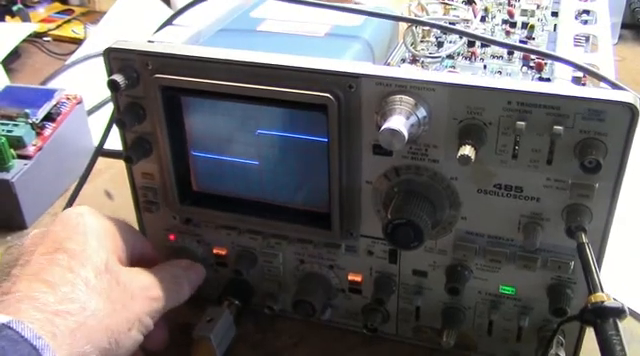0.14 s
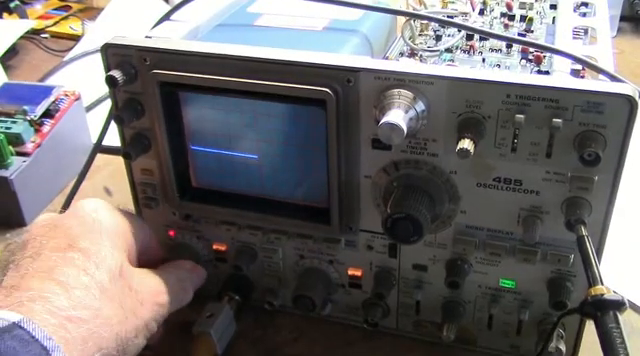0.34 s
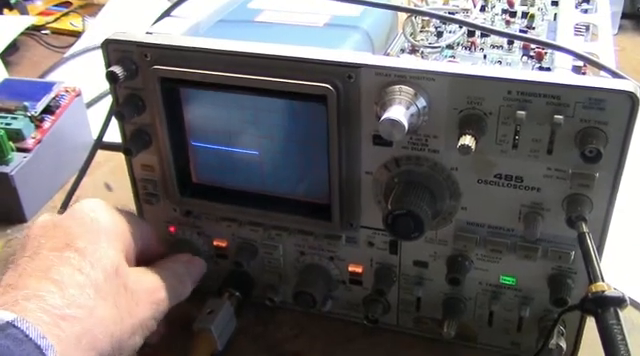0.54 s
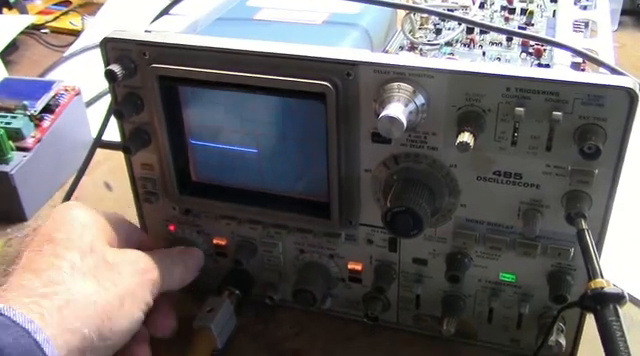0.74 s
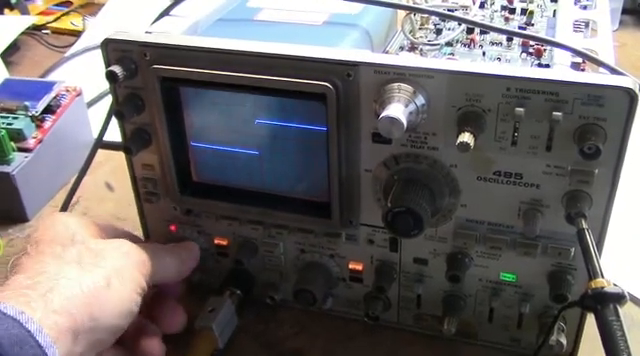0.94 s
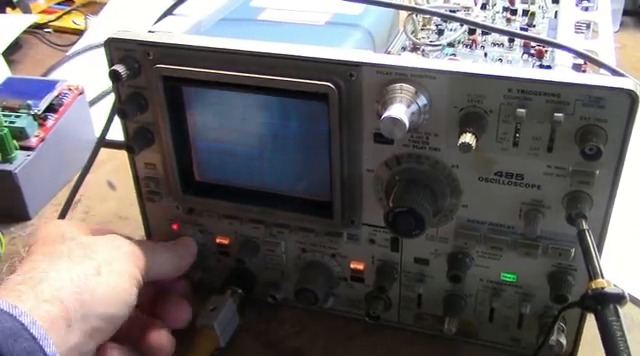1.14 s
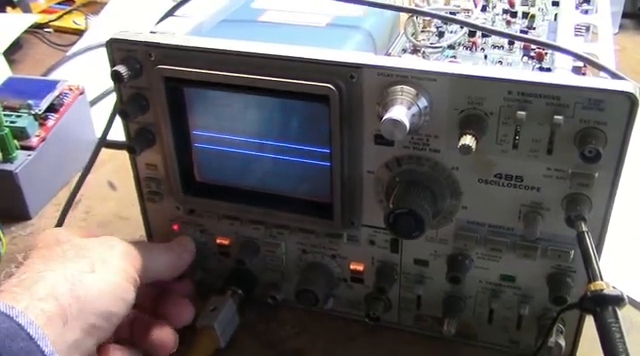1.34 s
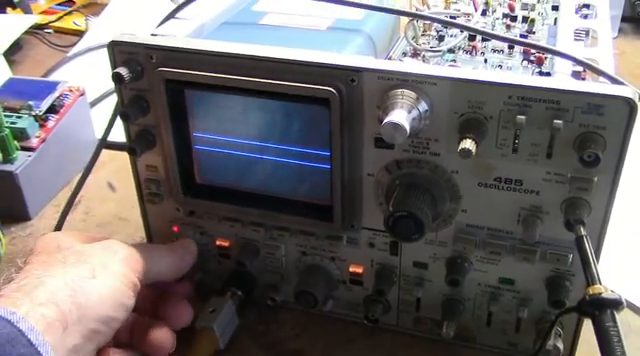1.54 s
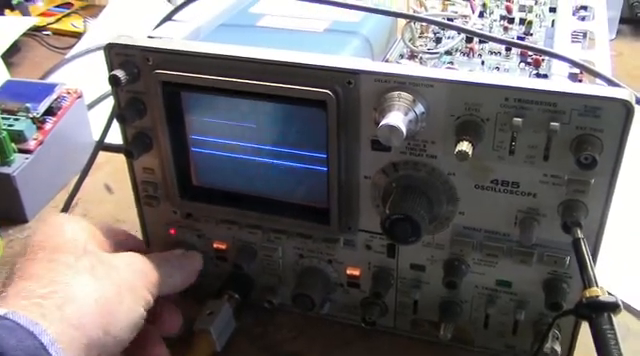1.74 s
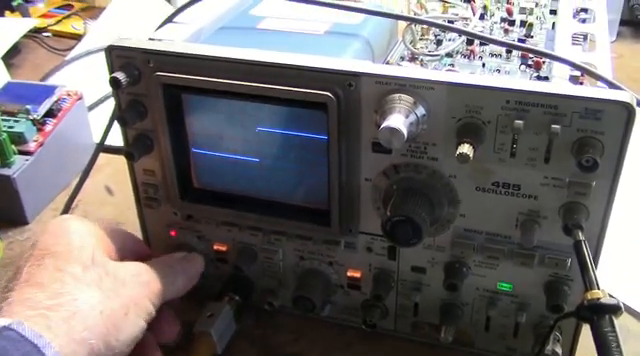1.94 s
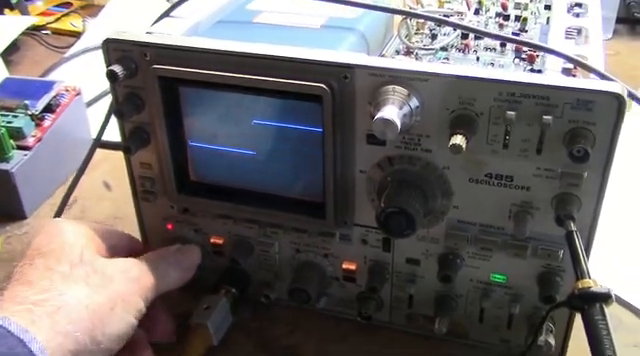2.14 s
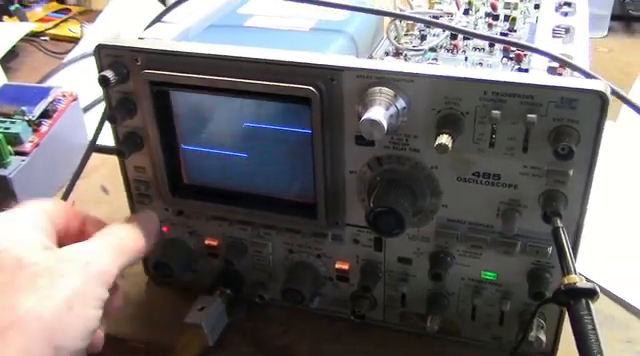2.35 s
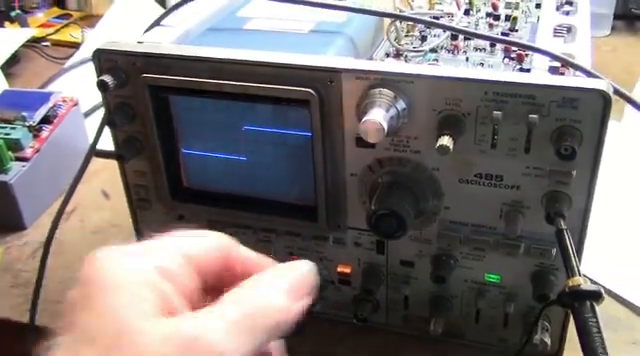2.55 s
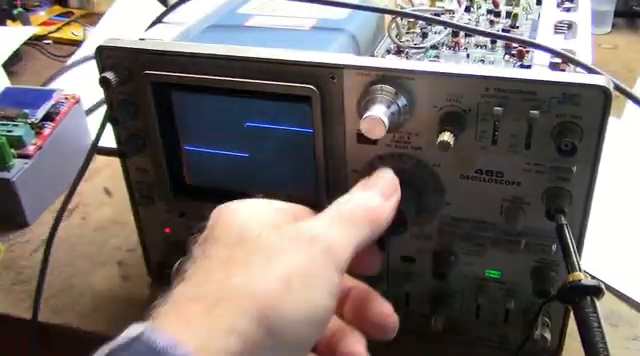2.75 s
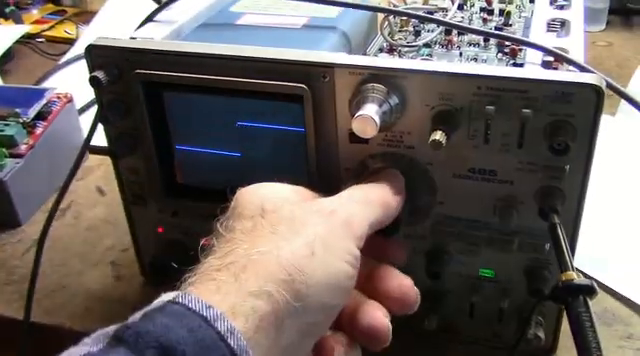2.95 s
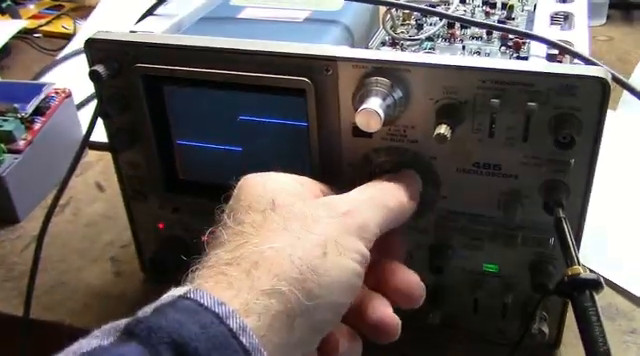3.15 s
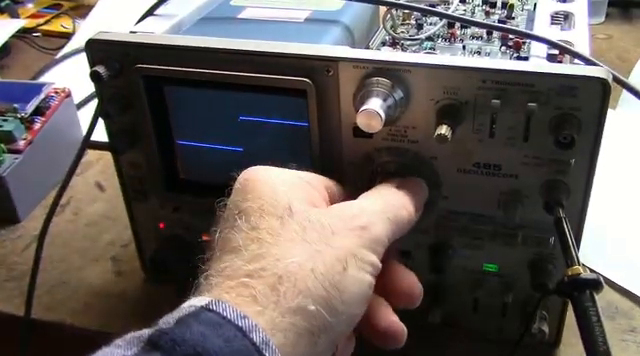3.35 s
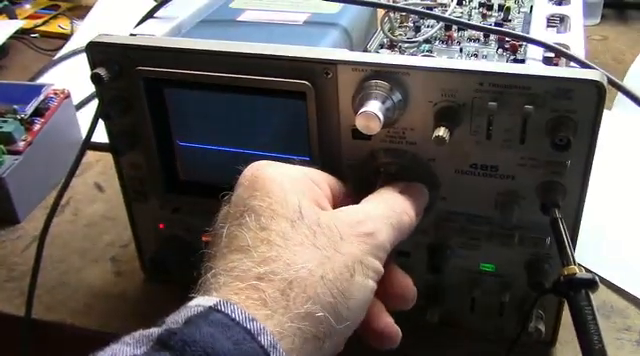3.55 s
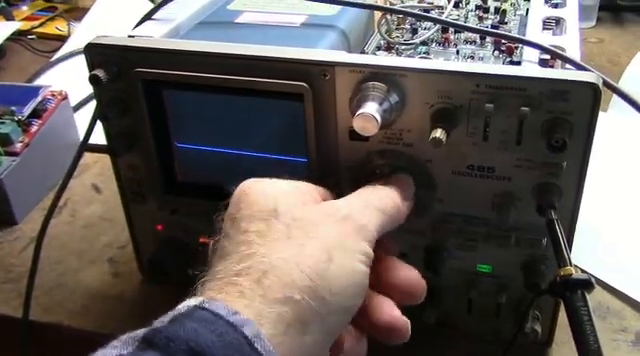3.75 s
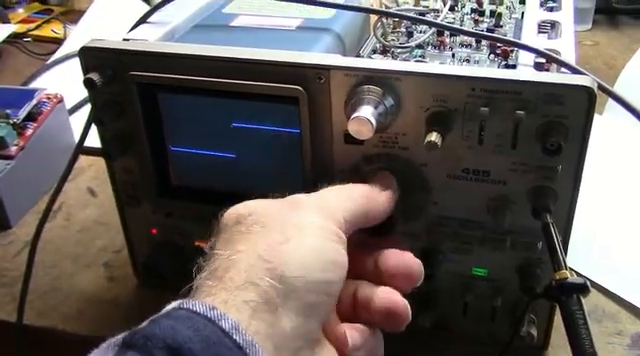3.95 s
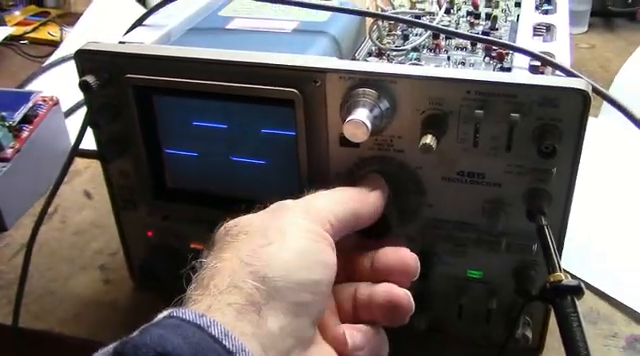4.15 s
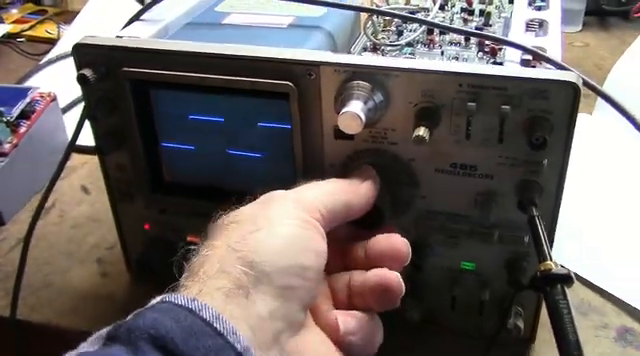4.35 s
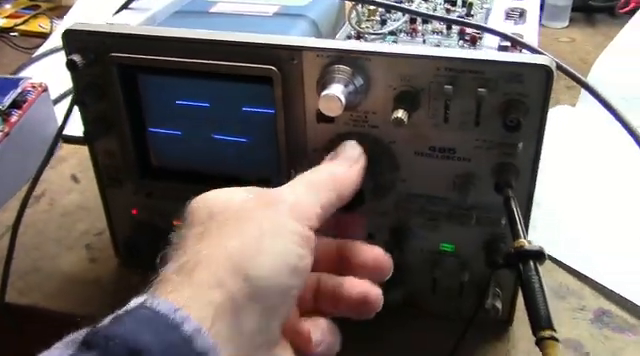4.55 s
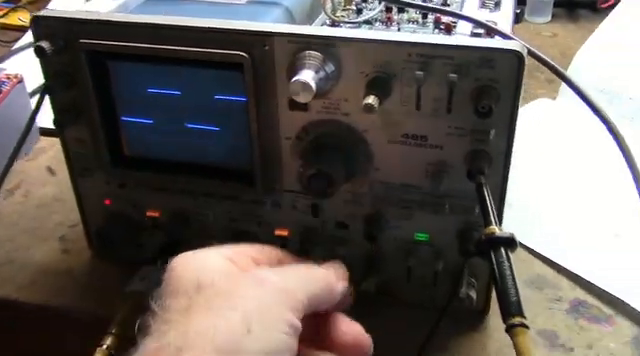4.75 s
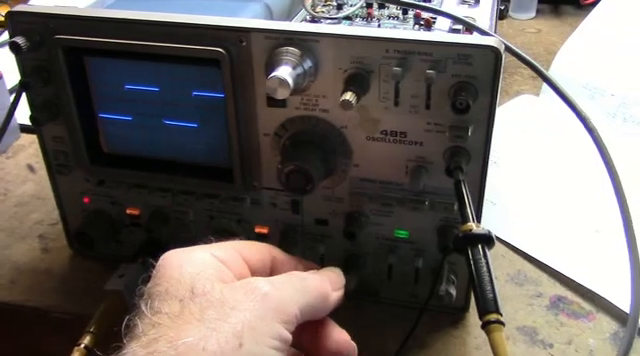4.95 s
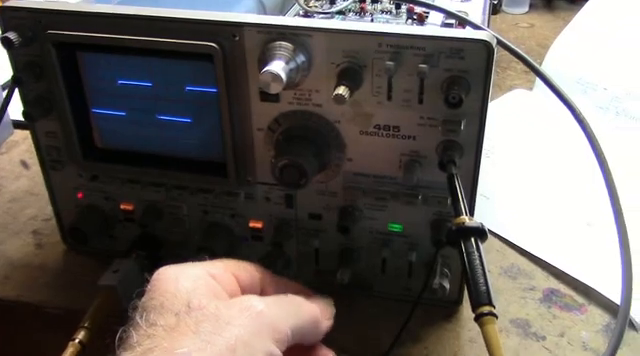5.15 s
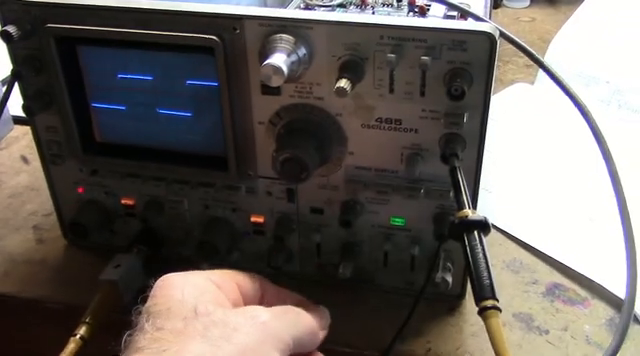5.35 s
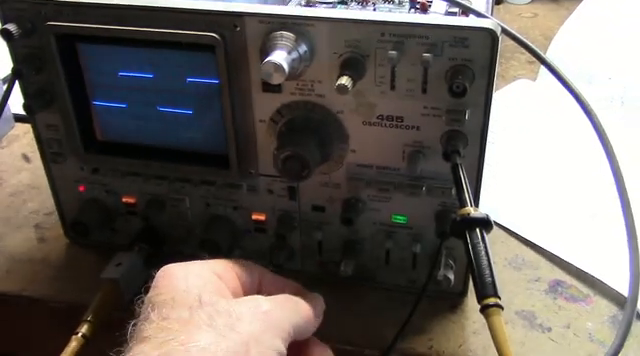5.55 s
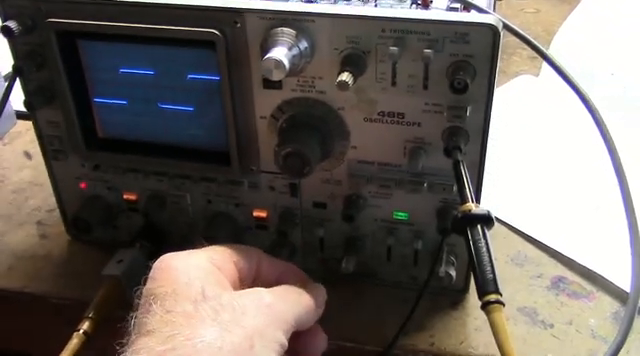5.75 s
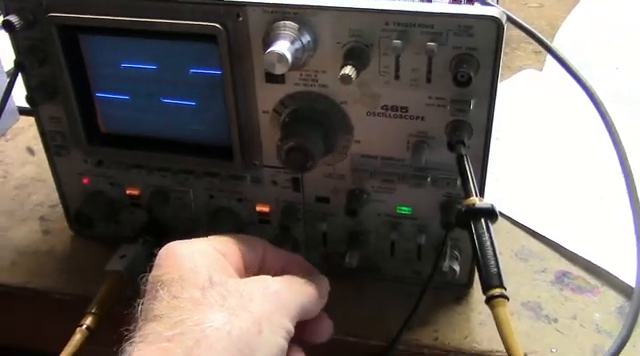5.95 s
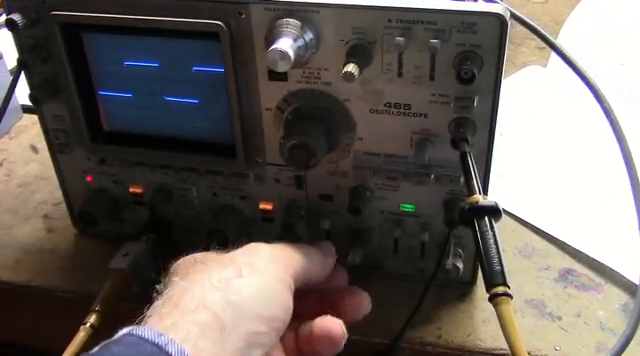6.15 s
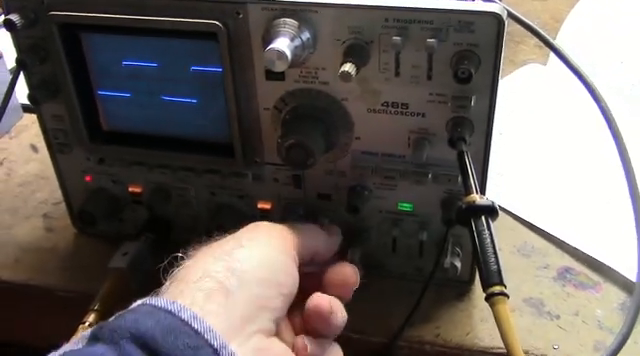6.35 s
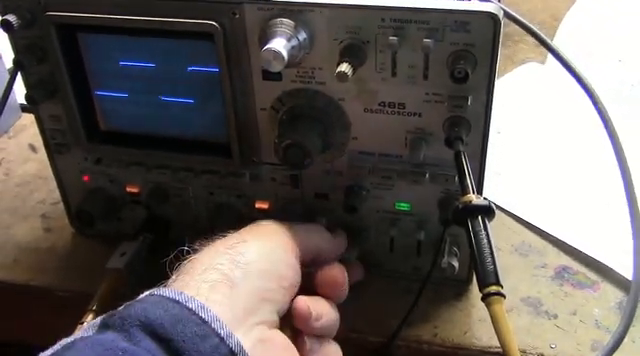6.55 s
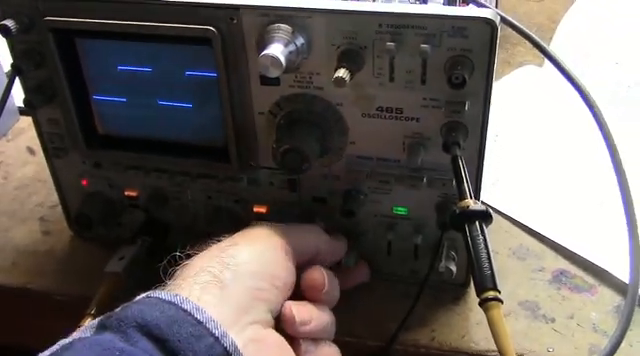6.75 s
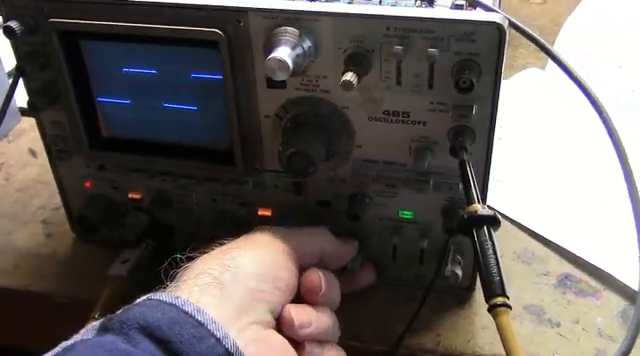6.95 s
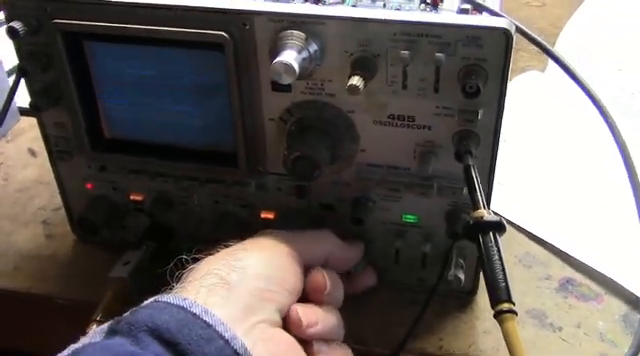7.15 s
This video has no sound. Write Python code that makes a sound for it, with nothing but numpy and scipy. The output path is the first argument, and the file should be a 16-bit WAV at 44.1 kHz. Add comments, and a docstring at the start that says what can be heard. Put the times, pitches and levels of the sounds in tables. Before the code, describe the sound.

Steady, soft cooling-fan air lies under close stereo switch sounds, with a short room tail. Slightly left, a small stiff knob squeaks, rasps and snaps through its detents, once grinding through with a rattle. Then, centred, a bigger knob makes one solid clack, a pause, and two more in quick succession, leaving a hollow metallic ring. Afterwards only faint knocks, a light finger rub and barely audible clock ticks remain.

```python
"""A cooling fan rushes; then a hand turns two rotary switches on an oscilloscope in a small, quiet workshop.
The small knob squeaks up its cam and snaps into each detent, once only scraping through; the big knob
clacks and rings the chassis. Fingers brush the panel and a faint clock ticks once a second.
Contacts are bursts of tiny impacts with damped modes; friction and moving air are coloured noise and
tones; a decaying diffuse tail is the room's answer to each short sound."""
import sys
import numpy as np
from scipy import signal
from scipy.fft import rfft, irfft, next_fast_len
from scipy.io import wavfile
from scipy.ndimage import map_coordinates

SR = 44100
rng = np.random.default_rng(int(sys.argv[2]) if len(sys.argv) > 2 else 0)


def materialize(psi):
    """Save the field psi as 16-bit PCM at rate SR to the path in sys.argv[1].

    A 1-D psi becomes a single channel; in a 2-D psi each row is a channel.
    """
    bounded = np.clip(np.atleast_2d(psi).T, -1, 1)
    quanta = np.round(bounded * 32767).astype(np.int16)
    wavfile.write(sys.argv[1], SR, quanta)


N = 317520  # samples: 7.2 s
T = np.arange(SR // 2) / SR  # time within one short sound, s

# modes of the front panel: [f/Hz, level/dB, t60/s]
PANEL_MODES = [(404, -18.5, 0.34), (601, -8.5, 0.083), (791, -3.5, 0.11), (907, -4.5, 0.15),
               (1135, -7, 0.049), (1235, 1, 0.042), (1373, 7, 0.045), (1456, 6.5, 0.044), (1522, -3, .08)]
# modes of the detent spring: [f/Hz, level/dB, t60/s]
SPRING_MODES = [(2080, -5, 0.058), (2324, 4.5, 0.033), (2388, -3.5, 0.06), (2493, -0.5, 0.066),
                (2670, -4.5, 0.052), (3320, -9, 0.038), (4140, -12, 0.067), (5260, -3, 0.031)]
# colour of the small switch's impacts: [f/Hz, relative level/dB]
SMALL_IMPACT_COLOUR = [(60, -51), (190, -21), (470, -25.5), (620, -9), (800, -5.5), (1450, -5.5),
                       (1750, -6), (2300, -7), (3000, -9), (4000, -11), (5400, -10), (9000, -13),
                       (13000, -14.5), (16000, -22)]
# colour of rubbing friction: [f/Hz, relative level/dB]
RUBBING_COLOUR = [(200, -27), (800, 6), (2200, -1.5), (4500, -10), (10000, -15.5), (16000, -29.5)]

CASE_BUMP_T60_S = 0.08  # the case's dull answer to a detent or a knock


def amp(db):
    """Level: decibels to an amplitude ratio."""
    return 10 ** (np.asarray(db) / 20)


def unit(x):
    """Normalisation: x at rms 1."""
    return x / np.sqrt(np.mean(x ** 2) + 1e-20)


def along(points, hz):
    """Logarithmic frequency scale: interpolate (Hz, value) points at hz."""
    f, v = np.transpose(points)
    return np.interp(np.log(hz + 1), np.log(f + 1), v)


def filtered(x, response):
    """Linear filtering: the spectrum of x times a frequency response."""
    n = x.shape[-1]
    padded = next_fast_len(n + 8192)
    hz = np.fft.rfftfreq(padded, 1 / SR)
    return irfft(rfft(x, padded) * response(hz), padded)[..., :n]


def noise(spectrum, size):
    """Spectral shaping: Gaussian noise coloured by (Hz, dB) points, at rms 1."""
    white = rng.standard_normal(size)
    return unit(filtered(white, lambda hz: amp(along(spectrum, hz))))


def wobble(rate):
    """Slow random modulation: a smooth curve through `rate` random knots a second."""
    knots = rng.standard_normal(int(N * rate / SR) + 4)
    return map_coordinates(knots, [np.arange(N) * rate / SR])


def fading(x, t60s):
    """Frequency-dependent damping: each band of x decays at its own t60."""
    hz, t, z = signal.stft(x, SR, nperseg=128)
    decay = amp(-60 * t / along(t60s, hz)[:, None])
    return signal.istft(z * decay, SR, nperseg=128)[1][..., :x.shape[-1]]


def shelves(x, body_db, bright_db, body_hz=550, bright_hz=4500):
    """Shelving filters: lift or lower the bass and the treble."""
    def response(hz):
        bass = body_db / (1 + (hz / body_hz) ** 4)
        treble = bright_db * hz ** 2 / (hz ** 2 + bright_hz ** 2)
        return amp(bass + treble)
    return filtered(x, response)


def swell(length):
    """Half-sine envelope: one smooth rise and fall over `length` seconds."""
    return np.sin(np.pi * np.clip(T / length, 0, 1))


def spread(pair):
    """Diffuse-field coherence: mix two unrelated signals to a set left-right correlation."""
    # left-right correlation: [f/Hz, correlation]
    likeness = [(60, 0.85), (150, 0.91), (380, 0.79), (950, 0.76), (2380, 0.73), (5980, 0.81), (15000, 1)]

    def mid_side(hz):
        turn = np.arccos(np.clip(along(likeness, hz), 0, 1)) / 2
        return np.array([np.cos(turn), np.sin(turn)])
    mid, side = filtered(pair, mid_side)
    return np.array([mid + side, mid - side])


def add(track, s, x, ringing=0):
    """Direct and reverberant sound: place x at s with a room tail; `ringing` has no room answer."""
    # decay of the room: [f/Hz, t60/s]
    room_decay = [(150, .3), (700, 0.24), (2500, 0.22), (7000, 0.18), (15000, 0.18)]
    # level sent into the room: [f/Hz, level/dB]
    room_send = [(150, -6), (700, -7), (2500, -11.5), (7000, -9), (11000, -17), (15000, -23)]
    # left-right difference of the direct sound: [f/Hz, level/dB]
    side_level = [(200, -25.5), (1200, -35), (4000, -21.5), (9000, -17), (15000, -24)]
    build_up = 1 - np.exp(-(T / 0.0076) ** 2)
    tail = fading(rng.standard_normal((2, len(T))), room_decay) * build_up
    tail = unit(tail) / np.sqrt(len(T))
    tail = spread(filtered(tail, lambda hz: amp(along(room_send, hz))))
    side = filtered(x, lambda hz: 1j * amp(along(side_level, hz)))  # a quarter cycle out of phase
    direct = x + ringing + np.array([side, -side])
    heard = direct + signal.fftconvolve(x[None], tail, axes=1)[:, :len(T)]
    place = track[:, round(s * SR):][:, :len(T)]
    place += heard[:, :place.shape[1]]


def ring(modes, rise, blur_hz, scatter_db=1):
    """Modal superposition: damped sines at scattered levels; random phase drift blurs their pitch."""
    hz, db, t60 = np.transpose(modes)[:, :, None]
    level = db + scatter_db * rng.standard_normal(hz.shape)
    steps = rng.standard_normal((len(hz), len(T)))
    drift = np.cumsum(steps, 1) * np.sqrt(2 * np.pi * abs(blur_hz) / SR)
    phase = 2 * np.pi * (hz * T + rng.random(hz.shape)) + drift
    return np.sum(amp(level - 60 * T / t60) * np.sin(phase), 0) * (1 - np.exp(-T / rise))


def crack(spectrum, seat_s, seat_db, rise, spiky_db=5):
    """Repeated impact: the part breaks free, then seats; each contact is a spray of tiny impacts."""
    # dense ring of the metal case: [f/Hz, t60/s]
    case_decay = [(200, 0.17), (1000, 0.07), (4000, 0.065), (14000, 0.025)]
    shape = (2, len(T))
    spikes = amp(spiky_db * np.clip(rng.standard_normal(shape), -2, 2))
    impacts = rng.standard_normal(shape) * spikes
    coloured = unit(filtered(impacts, lambda hz: amp(along(spectrum, hz))))
    first, second = fading(coloured, case_decay) * (1 - np.exp(-T / rise))
    return first + amp(seat_db) * np.interp(T - seat_s, T, second, left=0)


def bump(t60):
    """Forced response: the whole case answers a contact with a dull, decaying burst."""
    # colour of the bump: [f/Hz, relative level/dB]
    bump_colour = [(60, -33), (130, -10), (200, 4), (330, 1.5), (480, -3), (900, -4.5), (1400, -9.5),
                   (2500, -24.5), (8000, -54)]
    envelope = amp(-60 * T / t60) * (1 - np.exp(-T / 0.0011))
    return envelope * noise(bump_colour, len(T))


def small_detents():
    """Snap-through: the follower rubs up the cam, then snaps in and rings panel and spring."""
    # detents: [t/s, level/dB, panel ring/dB, spring ring/dB, brightness/dB]
    small_snaps = [(0.4145, -11, -.5, -18, -2.5), (0.976, -10, 0.5, -6.5, 2.5), (1.2592, -10, -2, 3, -0.5),
                   (1.855, -10, 0.5, 4, 2.5)]
    body_db, bump_db = -6.5, -36.5  # bass of the snap; case bump relative to the detent's level
    climb_s, climb_db, climb_bright_db = .029, -46, -4.5  # the rub starts climb_s ahead of the snap
    out = np.zeros((2, N))
    for s, db, panel_db, spring_db, bright_db in small_snaps:
        snap = amp(-8.5) * crack(SMALL_IMPACT_COLOUR, seat_s=.003, seat_db=0.5, rise=0.0015)
        snap += amp(panel_db - 14.5) * ring(PANEL_MODES, rise=0.0028, blur_hz=10)
        snap += amp(spring_db - 9) * ring(SPRING_MODES, rise=0.0023, blur_hz=44)
        contact = shelves(snap, body_db, bright_db) + amp(bump_db) * bump(CASE_BUMP_T60_S)
        add(out, s, amp(db) * contact)
        rub = shelves(noise(RUBBING_COLOUR, len(T)), 0, climb_bright_db)
        add(out, s - climb_s, amp(climb_db) * swell(climb_s * 1.25) * rub)
    return out


def big_detents():
    """Impact excitation: the long switch shaft seats harder and sets the chassis ringing."""
    # detents: [t/s, level/dB, body/dB, chassis ring/dB, wheel ring/dB, brightness/dB]
    big_clacks = [(3.467, -11.5, 1.5, -2, -8, 0.5), (3.9924, -9.5, -7, 0.5, 0, 0),
                  (4.138, -11, -6, -5, -5.5, -1.5)]
    # colour of the big switch's impacts: [f/Hz, relative level/dB]
    big_impact_colour = [(59, -52), (100, -27.5), (471, -9.5), (1030, -7), (1480, -14.5), (1610, -9.5),
                         (2320, -8.5), (3100, -10.5), (3600, -13), (4290, -10), (4670, -16), (6990, -8),
                         (10700, -6.5), (16000, -15)]
    # modes of the detent wheel: [f/Hz, level/dB, t60/s]
    wheel_modes = [(1287, -2, 0.059), (1453, 1, 0.086), (1803, -10, 0.075), (2360, -3, 0.055),
                   (6570, -1.5, 0.053), (8400, -7, 0.025)]
    # modes of the chassis: [f/Hz, level/dB, t60/s]
    chassis_modes = [(398, -8.5, 0.18), (502, -0.5, 0.39), (678, -10, 0.55), (860, -3.5, 0.22),
                     (1103, -6, 0.21)]
    bump_db = -30.5  # relative to the detent's level
    out = np.zeros((2, N))
    for s, db, body_db, chassis_db, wheel_db, bright_db in big_clacks:
        clack = amp(-13) * crack(big_impact_colour, seat_s=.003, seat_db=8, rise=0.00056)
        clack += amp(wheel_db - 13) * ring(wheel_modes, rise=0.003, blur_hz=40)
        contact = shelves(clack, body_db, bright_db) + amp(bump_db) * bump(CASE_BUMP_T60_S)
        chassis = amp(db + chassis_db - 22.5) * ring(chassis_modes, rise=0.0073, blur_hz=1.9)
        add(out, s, amp(db) * contact, chassis)
    return out


def knocks():
    """Light impact: a knob takes up its slack, duller when softer; the thumb taps the panel."""
    # knobs knocking in their play: [t/s, level/dB]
    slack_knocks = [(1.24, -16), (1.706, -17.5), (1.733, -15.5), (1.747, -20.5), (3.7526, -13.5),
                    (4.509, -20), (4.576, -26.5), (5.829, -28.5)]
    body_db, panel_db, spring_db, bump_db = 3, -34.5, -25.5, -33  # relative to the knock's level
    dulling = 0.8  # dB of treble lost per dB of level
    tap_s, tap_db, tap_body_db, tap_t60_s = 1.187, -28.5, -9, 0.015
    out = np.zeros((2, N))
    for s, db in slack_knocks:
        knock = amp(-20.5) * crack(SMALL_IMPACT_COLOUR, seat_s=0.0082, seat_db=-6.5, rise=0.00069)
        knock += amp(panel_db) * ring(PANEL_MODES, rise=0.0016, blur_hz=12)
        knock += amp(spring_db) * ring(SPRING_MODES, rise=.001, blur_hz=34.9)
        contact = shelves(knock, body_db, dulling * db) + amp(bump_db) * bump(CASE_BUMP_T60_S)
        add(out, s, amp(db) * contact)
    add(out, tap_s, amp(tap_db) * shelves(bump(tap_t60_s), tap_body_db, 0))
    return out


def scrape(rough_db=1.0):
    """Sliding friction: held back by the fingers, the follower grinds down the cam in a dying rattle."""
    # colour of the grind: [f/Hz, relative level/dB]
    grind_colour = [(59, -54), (100, -24), (174, -11), (736, -3.5), (1010, -15.5), (1760, -10), (1950, -11),
                    (5530, -14), (13800, -29.5), (16000, -34.5)]
    # decay of the grind: [f/Hz, t60/s]
    grind_decay = [(500, 0.22), (3000, 0.17), (12000, 0.16)]
    start_s, scrape_db = 1.667, -33.5
    out = np.zeros((2, N))
    grind = fading(noise(grind_colour, len(T)), grind_decay)
    level_db = scrape_db + rough_db * wobble(355)[:len(T)]
    add(out, start_s, amp(level_db) * (1 - np.exp(-T / 0.0014)) * grind)
    return out


def cam_slips():
    """Stick-slip release: each jerk of the dry cam is a short rasp that rings the cam's modes."""
    # jerks: [t/s, level/dB]
    jerks = [(0.6402, -46.5), (0.6735, -37.5), (0.7038, -36), (0.7716, -40.5), (0.831, -41), (0.851, -37.5),
             (0.8781, -43), (1.136, -37.5), (1.78, -41.5)]
    # colour of the rasp: [f/Hz, relative level/dB]
    rasp_colour = [(300, -29), (800, 1.5), (1500, -1.5), (2400, -6.5), (3500, -12.5), (5500, -16),
                   (6600, 1), (8000, -17.5), (14000, -22), (17000, -30)]
    # modes of the cam: [f/Hz, level/dB, t60/s]
    cam_modes = [(1550, -3.5, 0.12), (2340, -5.5, 0.13), (4760, -14, 0.24), (5200, -8, 0.18),
                 (6300, 4, 0.041), (6940, 3, 0.034)]
    rasp_db, ring_db = -5, -13  # relative to the jerk's level
    out = np.zeros((2, N))
    for s, db in jerks:
        envelope = (1 - np.exp(-T / 0.001)) * amp(-60 * T / 0.051)
        jerk = amp(rasp_db) * noise(rasp_colour, len(T)) * envelope
        jerk += amp(ring_db) * ring(cam_modes, rise=0.0018, blur_hz=25)
        add(out, s, amp(db) * jerk)
    return out


def cam_squeaks():
    """Friction tone: three harmonics whose pitch follows the grip, over a little rubbing noise."""
    # squeaks: [t/s, length/s, tone level/dB]
    squeaks = [(0.383, 0.023, -54), (0.952, 0.013, -40), (0.966, 0.012, -38), (1.204, 0.027, -49),
               (1.231, 0.018, -51)]
    rub_db = -53.5
    base_hz, reference_db, hz_per_db = 4570, -39.5, 10.5  # a louder squeak is higher
    out = np.zeros((2, N))
    for s, length, db in squeaks:
        grip = swell(length)
        pitch_hz = base_hz + hz_per_db * (db - reference_db)
        waver = .014 * wobble(400)[:len(T)]
        bend = 1 + 0.054 * (grip - .85) + waver
        phase = 2 * np.pi * np.cumsum(pitch_hz * bend) / SR
        tone = sum(amp(level) * np.sin((k + 1) * phase) for k, level in enumerate([0, -12, -13]))
        rub = amp(rub_db) * noise(RUBBING_COLOUR, len(T))
        add(out, s, grip * (amp(db) * tone + rub))
    return out


def finger_rubs():
    """Skin friction: fingers brushing a knob give short swells of coloured noise."""
    # brushes: [t/s, length/s, level/dB, brightness/dB]
    brushes = [(2.936, 0.039, -57, -6), (3.118, 0.024, -55, -2), (3.156, 0.013, -56, -1),
               (3.227, 0.037, -59, -4), (6.185, 0.052, -59.5, 12)]
    out = np.zeros((2, N))
    for s, length, db, bright_db in brushes:
        rub = shelves(noise(RUBBING_COLOUR, len(T)), 0, bright_db)
        add(out, s, amp(db) * swell(length) * rub)
    return out


def fan():
    """Flow noise: moving air with a few wavering tones, a thin whistle and a low rumble."""
    # colour of the rush of air: [f/Hz, relative level/dB]
    air_colour = [(41, -55), (70, -21), (108, -1.5), (159, -8.5), (195, -1), (293, -3), (451, -5.5),
                  (517, -5), (635, -7.5), (913, -10), (1410, -16.5), (1810, -15), (2430, -19), (10400, -31),
                  (16000, -40.5)]
    # colour of the rumble: [f/Hz, relative level/dB]
    rumble_colour = [(20, -6), (50, 0.5), (80, -10), (140, -41)]
    # wavering tones: [f/Hz, level/dB]
    fan_tones = [(123.8, -76.5), (274.5, -91), (899, -70.5)]
    t = np.arange(N) / SR
    rush_db = -55.5 - 0.2667 * t + 0.53 * wobble(6.5)  # slowly recedes, in dB per second
    rush = amp(rush_db) * unit(spread(noise(air_colour, (2, N))))
    tones = np.zeros(N)
    for hz, db in fan_tones:
        tone = np.sin(2 * np.pi * hz * t + 1.13 * wobble(7))
        tones += amp(db + 2.2 * wobble(4.6)) * unit(tone)
    narrow_band = lambda hz: 1 / (1 + ((hz - 10550) / 220) ** 2)
    whistle = unit(filtered(rng.standard_normal(N), narrow_band))
    whistle_db = -82 - 2 * t  # recedes faster than the rush
    rumble = amp(-75) * noise(rumble_colour, (2, N))
    return rush + tones + amp(whistle_db) * whistle + rumble


def clock():
    """Reverberant blurring: a far tick each second has a soft onset and a long decay."""
    # colour of the tick: [f/Hz, relative level/dB]
    tick_colour = [(500, -23), (1800, -4.5), (3300, 2.5), (4600, -11), (7000, -11), (14000, -30)]
    out = np.zeros((2, N))
    for second in range(7):
        envelope = (1 - np.exp(-T / 0.011)) * amp(-60 * T / 0.17)
        add(out, second + .945, amp(-52.0) * noise(tick_colour, len(T)) * envelope)
    return out


def scene():
    """Level panning: all but the big knob lie slightly to the left."""
    small_knob = small_detents() + knocks() + scrape()
    friction = cam_slips() + cam_squeaks() + finger_rubs()
    left = (small_knob + friction + fan() + clock()) * amp([[.45], [-.45]])
    return left + big_detents()


def record(dry):
    """Band limiting: thin the deep bass and cut steeply above the top frequency."""
    top_hz = 16000
    high_pass = signal.butter(2, 75, 'highpass', fs=SR, output='sos')
    thinned = signal.sosfilt(high_pass, dry)
    return filtered(thinned, lambda hz: 1 / (1 + (hz / top_hz) ** 120))


dry = scene()
out = record(dry)
materialize(out)
```